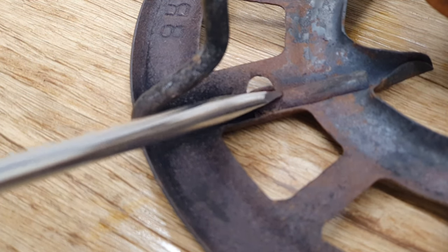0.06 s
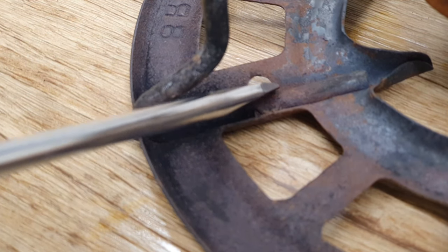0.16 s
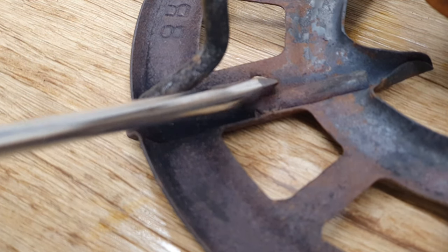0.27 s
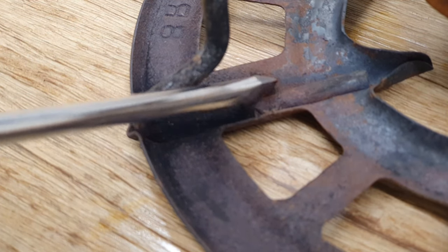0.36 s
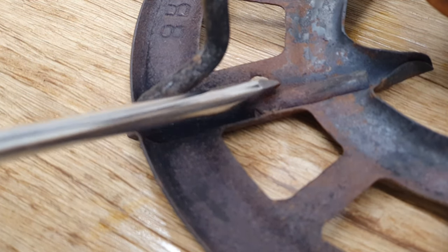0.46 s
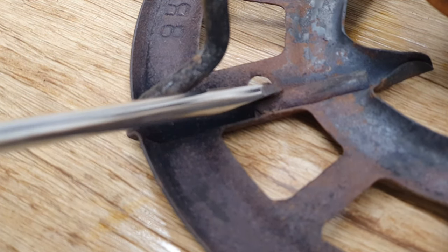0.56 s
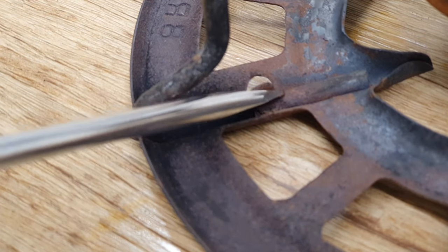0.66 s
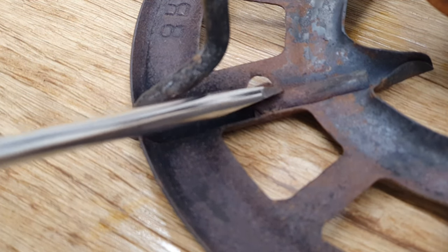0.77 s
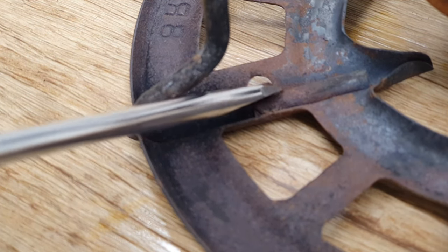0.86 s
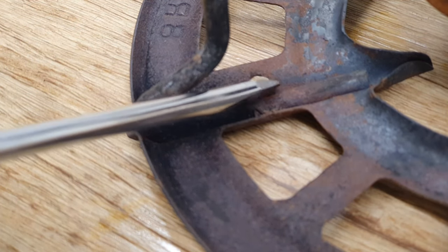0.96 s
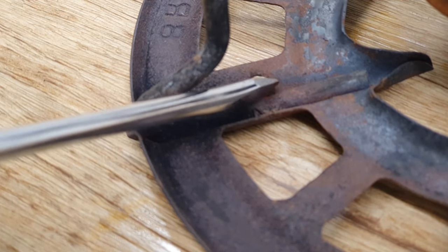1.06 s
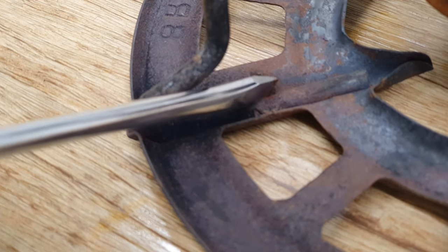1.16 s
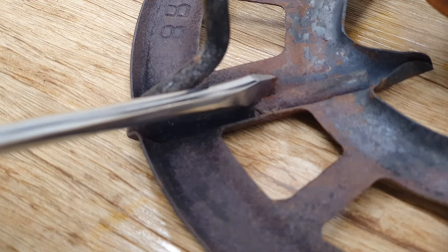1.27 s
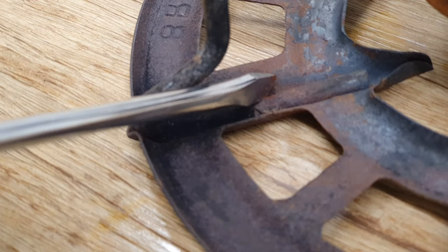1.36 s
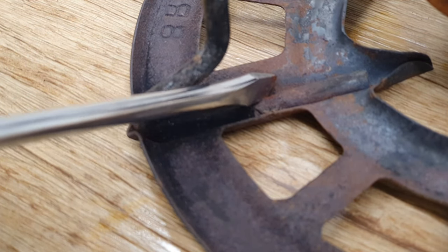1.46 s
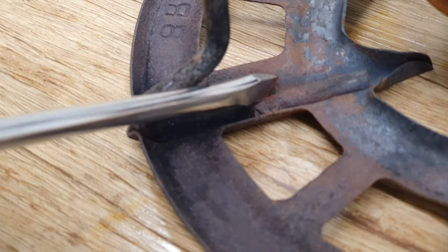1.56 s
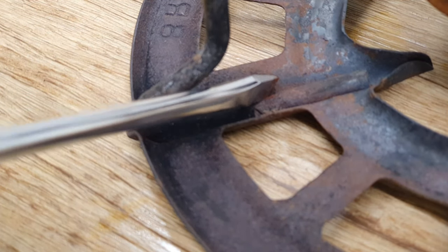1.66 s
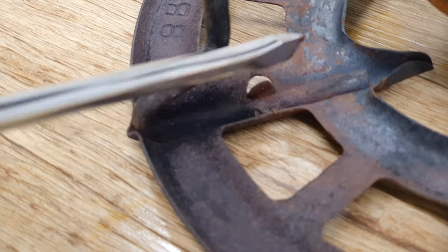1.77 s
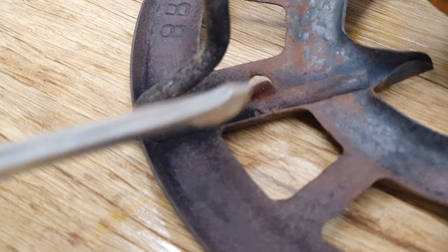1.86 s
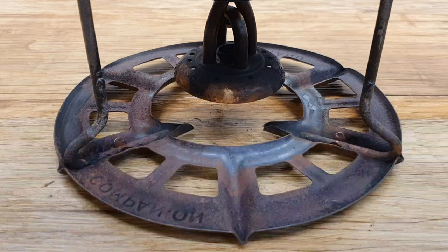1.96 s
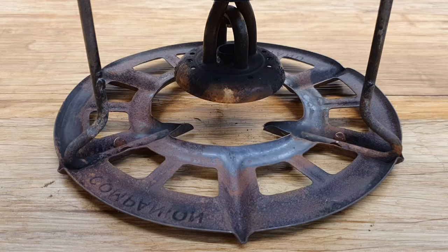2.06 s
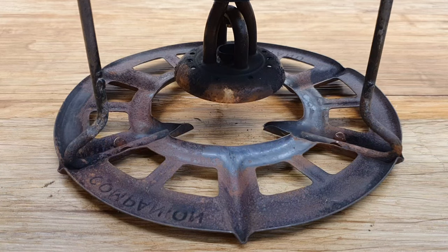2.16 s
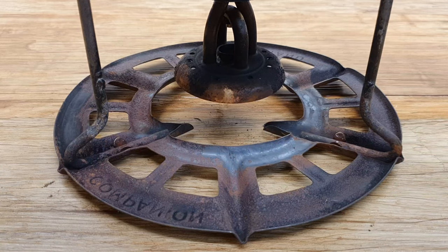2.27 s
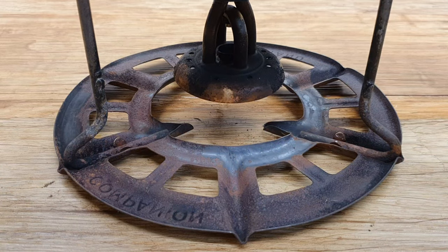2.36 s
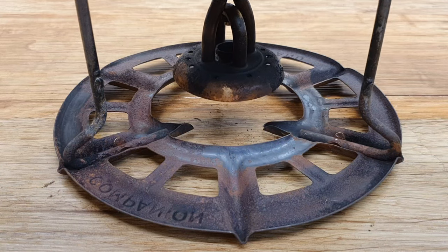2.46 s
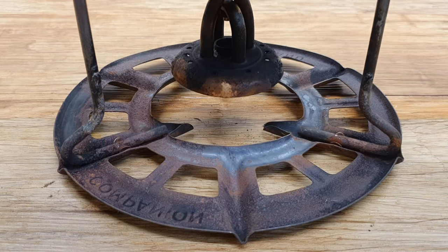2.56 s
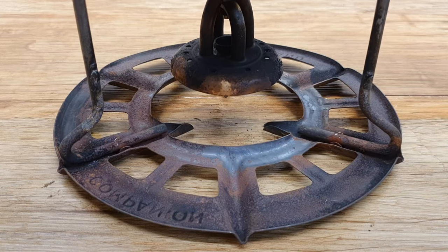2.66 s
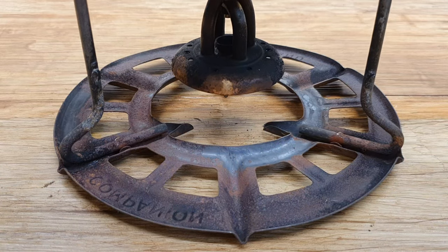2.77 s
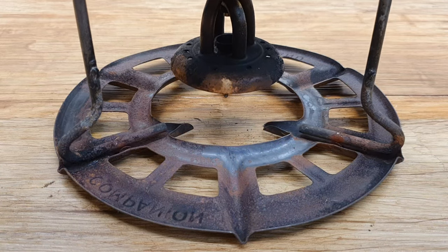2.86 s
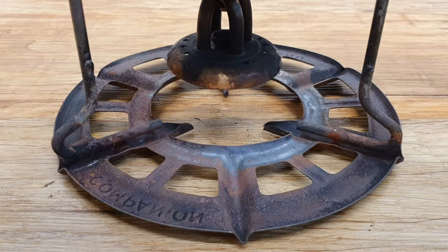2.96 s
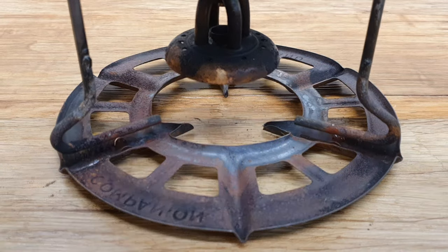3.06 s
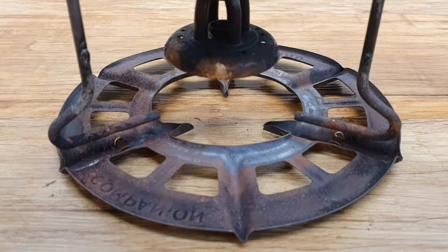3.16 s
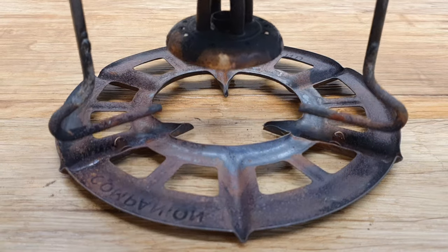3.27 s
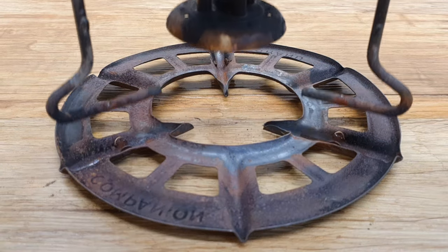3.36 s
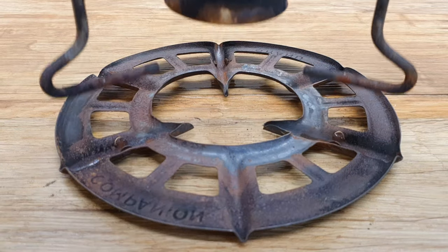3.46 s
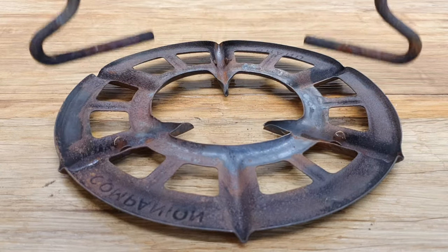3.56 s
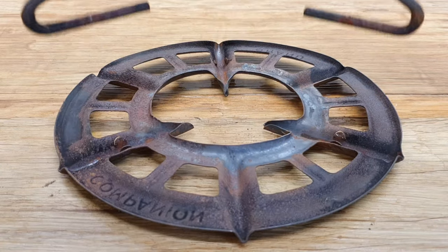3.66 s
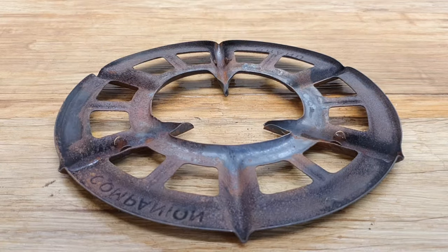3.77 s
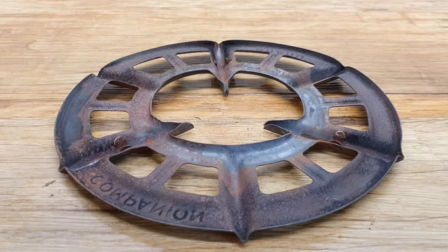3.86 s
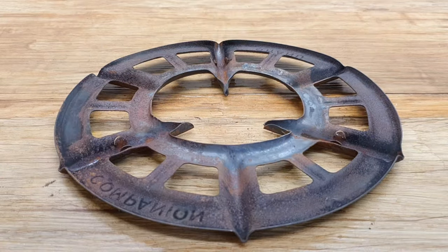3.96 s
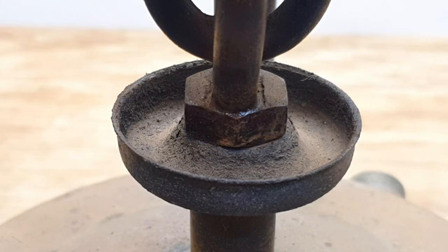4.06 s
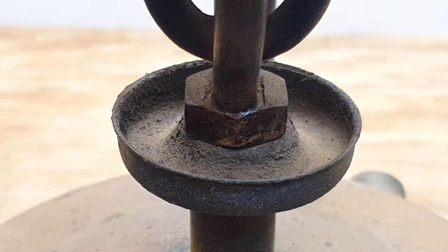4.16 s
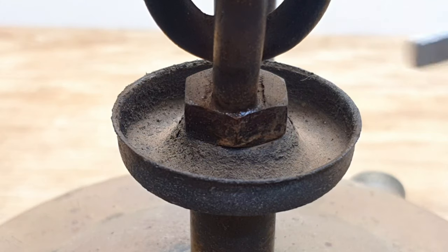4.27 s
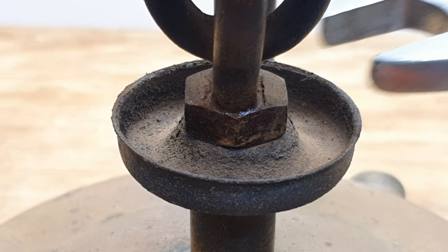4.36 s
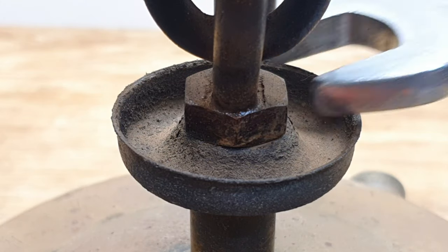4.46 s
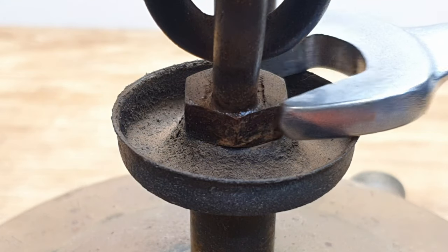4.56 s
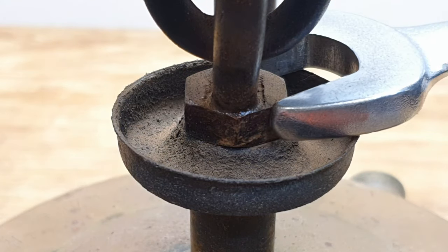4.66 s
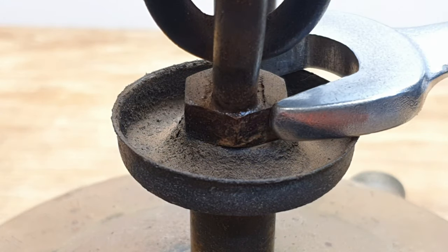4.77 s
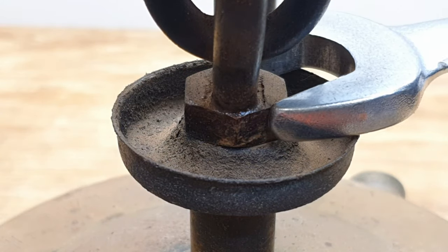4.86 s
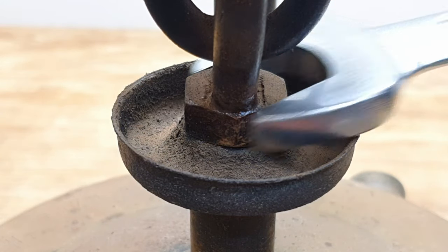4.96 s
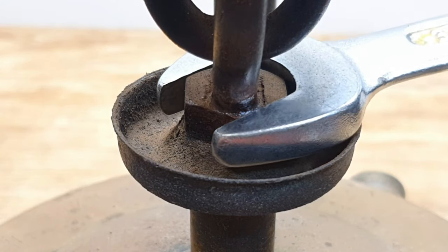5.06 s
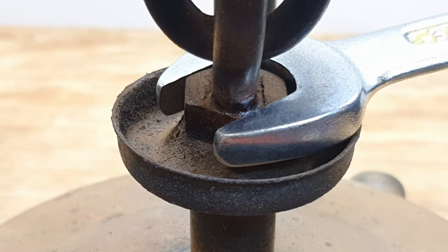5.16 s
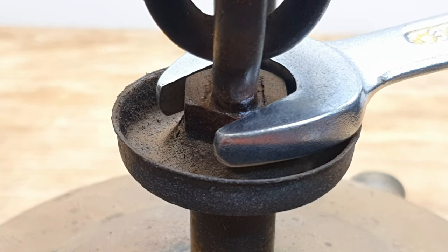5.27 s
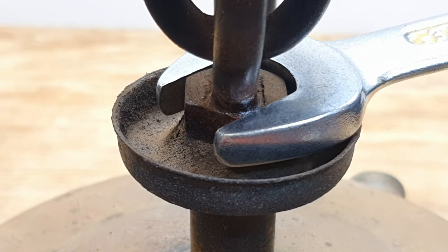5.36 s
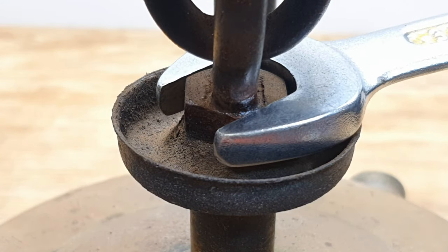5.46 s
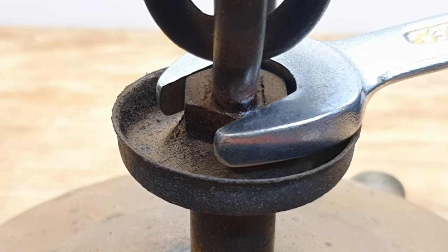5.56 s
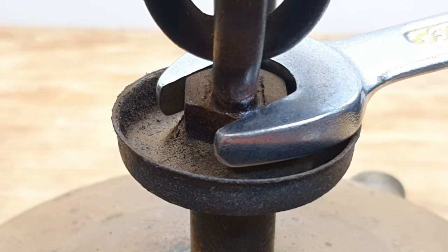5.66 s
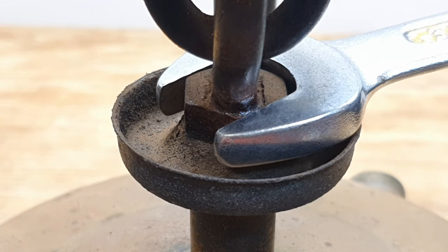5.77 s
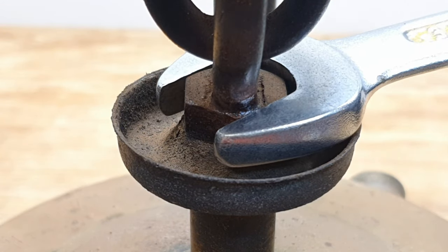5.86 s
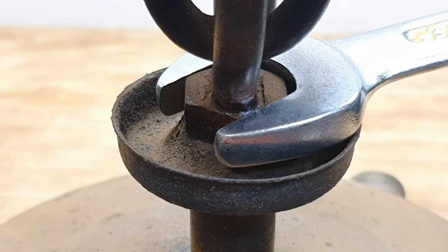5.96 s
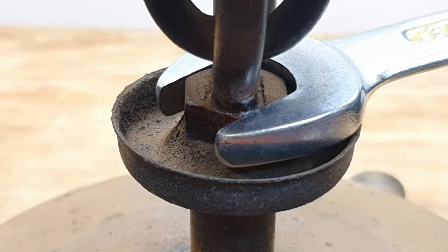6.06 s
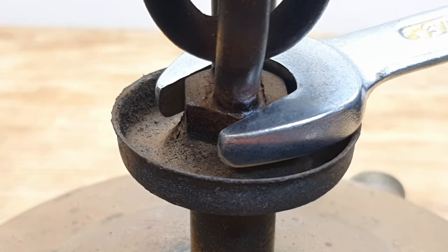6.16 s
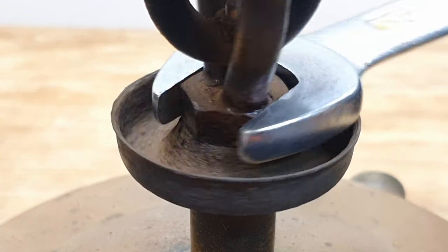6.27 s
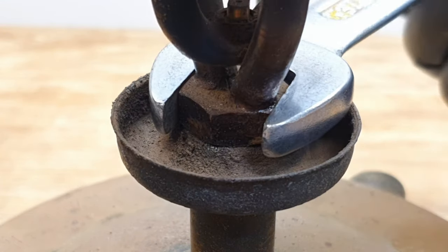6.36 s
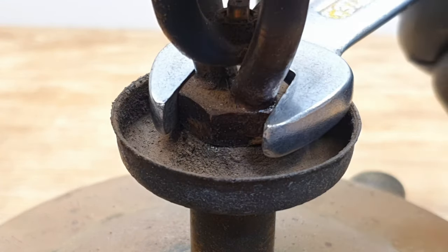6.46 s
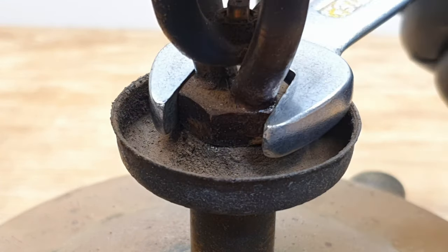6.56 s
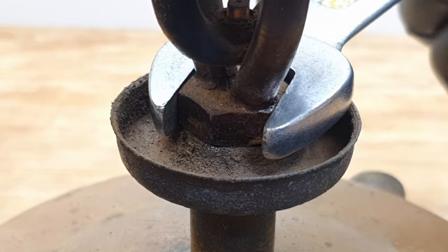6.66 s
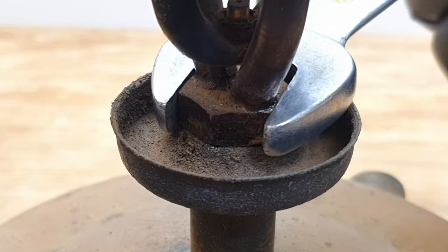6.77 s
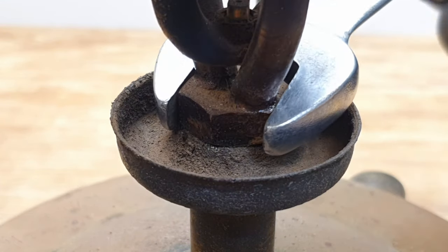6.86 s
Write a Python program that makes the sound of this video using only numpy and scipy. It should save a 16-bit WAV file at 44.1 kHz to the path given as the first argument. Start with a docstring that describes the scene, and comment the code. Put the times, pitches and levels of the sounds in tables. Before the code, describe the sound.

Close to a stereo microphone, rusty steel stove parts are worked on a wooden workshop bench over a low hum and rumble. Gritty scratches and ticks of a screwdriver come first, then the clatter and scrape of a wire frame dragged off a plate. After a brief faint hiss, a spanner strikes the burner and seats on the nut with a louder, ringing clack. The nut squeaks faintly and the grip shifts with light clicks.

```python
"""A rusty steel stove on a wooden workshop bench, close to a stereo microphone, over a low rumble and hum.
First a screwdriver scratches along a pressed steel plate, ticking as it catches on rust. From 2 s a wire
frame knocks on the plate, is dragged off it, sings faintly as it hangs free and is set aside. Just after
4 s a faint hiss lifts the background for half a second. Then a spanner bumps the burner and slides onto
its nut with a ringing clack that booms through the bench. The nut squeaks faintly and the grip shifts."""
import sys
import numpy as np
from scipy import signal
from scipy.fft import rfft, irfft
from scipy.io import wavfile
from scipy.ndimage import uniform_filter1d

SR = 44100
rng = np.random.default_rng(int(sys.argv[2]) if len(sys.argv) > 2 else 0)


def to_wav(sig):
    """Store sig (one row per channel, or 1-D mono) as 16-bit WAV at the path in sys.argv[1].

    Samples outside -1..1 are clipped; the rate is SR.
    """
    pcm = np.clip(np.atleast_2d(sig), -1, 1) * 32767
    pcm = np.round(pcm).astype(np.int16)
    wavfile.write(sys.argv[1], SR, pcm.T)  # frames by channels


N = 304731
TIME = np.arange(N) / SR
RING_TIME = np.arange(SR // 2) / SR
RUB_RISE_S, RUB_T60_S = 0.029, 0.25

# spectra of rust grit, of the bench under it and of clashing steel: frequency_hz, level_db
GRIT_SPECTRUM = [(400, -28), (900, -3), (2100, -4), (2700, -6.5), (4200, -2.5), (5800, -1.5), (7400, 3),
                 (8700, -4.5), (10500, -2.5), (12500, 3), (15200, 0), (16500, 6)]
WOOD_SPECTRUM = [(35, -41), (90, 14), (170, -0.5), (280, 0), (380, -3.5), (560, -2), (760, -13.5),
                 (1300, -18.5), (3000, -19.5), (8000, -39)]
CLASH_SPECTRUM = [(100, 8), (500, 1), (1400, 4), (2300, -3), (4000, -4.5), (6000, -12.5), (16000, -29.5)]
# the stove's foot knocking on the bench: pitch_hz, level_db, t60_s, left_right_db
THUD_MODES = [(175, -7.5, 0.063, -3), (259, 0.5, 0.061, 2), (420, -5.5, .04, -1.5), (558, -3, 0.045, -2)]
# faint rubbing of steel and hand: the frame is set aside, then the grip shifts on the spanner; between
# them, at 4.12 s, a steady hiss lifts the background: start_s, length_s, steel_db, hand_db
FAINT_RUBS = [(3.82, 0.072, -74.5, -89), (4.12, 0.5, -81, -106), (4.33, 0.19, -87, -80.5),
              (4.93, .07, -102, -84), (5.02, .06, -84, -71.5), (5.41, 0.35, -72, -92.5),
              (6.365, 0.13, -75.5, -74.5), (6.56, 0.035, -76.5, -81), (6.63, .07, -80, -91.5),
              (6.85, 0.071, -76, -68)]


def amp(db):
    """Decibels to gain."""
    return 10 ** (np.asarray(db) / 20)


def unit_rms(x):
    """Scales to an rms of one."""
    return x / np.sqrt(np.mean(x ** 2) + 1e-20)


def curve_at(points, hz):
    """Reads a curve on a log-frequency axis."""
    point_hz, value = np.transpose(points)
    return np.interp(np.log(hz + 1), np.log(point_hz + 1), value)


def add(mix, start_s, sound):
    """Mixes a sound in at its start time."""
    part = mix[:, max(round(start_s * SR), 0):][:, :sound.shape[1]]
    part += sound[:, :part.shape[1]]


def pan(db):
    """Left and right gains for a level difference."""
    return amp(np.array([[.5], [-.5]]) * db)


def colour(x, spectrum, lean=1):
    """Shapes two unrelated signals into a stereo pair: bass shared, treble mostly leaning left."""
    # likeness of the two channels: frequency_hz, coherence
    likeness = [(60, 0.94), (150, 0.91), (600, 0.45), (1400, 0), (3000, 0.087), (16000, 0)]
    # balance at the microphone: frequency_hz, left_right_db
    balance = [(100, -1.5), (700, 0.5), (1400, 0.5), (4400, 4.5), (6000, 2.5), (8100, 11.5), (10500, -3.5),
               (15000, 8)]
    hz = np.fft.rfftfreq(x.shape[1], 1 / SR)
    left, unrelated = rfft(x)
    shared = np.clip(curve_at(likeness, hz), 0, 1)
    right = shared * left + np.sqrt(1 - shared ** 2) * unrelated
    shaped = np.array([left, right]) * amp(curve_at(spectrum, hz)) * pan(lean * curve_at(balance, hz))
    return unit_rms(irfft(shaped, x.shape[1]))


def resonate(x, peaks, order=1):
    """Resonances (pitch_hz, width_hz, level_db); a higher order leaves darker valleys between them."""
    hz = np.fft.rfftfreq(N, 1 / SR)
    response = sum(amp(db) / (1 + 2j * (hz - pitch) / width) ** order for pitch, width, db in peaks)
    return unit_rms(irfft(rfft(x) * response, N))


def ring(modes):
    """Dying sines that build up in about one cycle; higher ones differ more in phase left to right."""
    t, out = RING_TIME, 0
    for hz, db, t60, side_db in modes:
        phase = np.array([[1], [-1]]) * rng.normal() * min(hz / 5000, .6)
        envelope = amp(db - 60 * t / t60) * (1 - np.exp(-t * hz))
        out = out + pan(side_db) * envelope * np.sin(2 * np.pi * hz * t + phase)
    return out


def burst(spectrum, t60, tail_db, tail_t60, lean=1):
    """A blow's crowd of short-lived modes, with a weaker, longer tail."""
    t = RING_TIME
    fade = amp(-60 * t / t60) + amp(tail_db - 60 * t / tail_t60)
    attack = 1 - np.exp(-t / .0005)
    return colour(rng.standard_normal((2, len(t))), spectrum, lean) * fade * attack


def friction(per_s, spread_db, clump_db, hiss):
    """Rust grains snapping in clumps, each a tiny puff, over a smooth hiss."""
    sizes = amp(spread_db * np.minimum(rng.exponential(1, N), 4))
    snaps = sizes * (rng.random(N) < per_s / SR)
    power = signal.lfilter([1], [1, -np.exp(-1 / (0.00085 * SR))], snaps ** 2)
    clumps = unit_rms(uniform_filter1d(uniform_filter1d(rng.standard_normal(N), size=500), size=300))
    envelope = np.sqrt(power / power.mean() + hiss) * amp(clump_db * clumps)
    return unit_rms(envelope * rng.standard_normal((2, N)))


def convolve_tail(x, tail):
    """The ringing a signal leaves through a decaying tail, scaled to unit energy on the left."""
    return signal.fftconvolve(x, tail / np.linalg.norm(tail[0]), axes=1)[:, :N]


def body(x, t60, direct):
    """Crowded steel modes: a short random ring that gives friction a steady, uneven colour."""
    t = RING_TIME[:len(RING_TIME) // 4]
    tail = rng.standard_normal((2, len(t))) * amp(-60 * t / t60)
    return unit_rms(direct * x + convolve_tail(x, tail))


def wander(x, depth_db):
    """The contact point moves, so different modes swell and fade in turn."""
    spectra = signal.stft(x, nperseg=1024, noverlap=768)[2]
    patches = uniform_filter1d(rng.standard_normal(spectra.shape[1:]), size=4, axis=0)
    patches = unit_rms(uniform_filter1d(patches, size=12, axis=1))
    return unit_rms(signal.istft(spectra * amp(depth_db * patches), nperseg=1024, noverlap=768)[1][:, :N])


def strokes(rows, rise_s, t60, swell_db=0, db_column=2):
    """Gain over time for rows of start_s, length_s and levels: each rises, holds or swells, and dies."""
    power = np.zeros(N)
    for row in rows:
        first, length_s = round(row[0] * SR), row[1]
        t = TIME[:N - first][:round((length_s + t60) * SR)]
        swell = swell_db * np.minimum(t / length_s - 1, 0)
        decay = 60 * np.maximum(t - length_s, 0) / t60
        gain = np.minimum(t / rise_s, 1) * amp(row[db_column] + swell - decay)
        power[first:first + len(t)] += gain ** 2
    return np.sqrt(power)


def background():
    """Still air, a wavering hum and a handling rumble that swells as weight sways the bench."""
    # spectra of the quiet room and of the rumble: frequency_hz, level_db
    air_spectrum = [(12, -50), (20, -14.5), (86, -5.5), (134, -17.5), (293, -23.5), (367, -28.5),
                    (485, -31.5), (642, -29.5), (1060, -32.5), (1190, -35.5), (1660, -37.5), (1860, -35.5),
                    (8180, -47), (13500, -46), (16000, -46)]
    rumble_spectrum = [(20, -10.5), (45, -4.5), (65, 0.5), (87, -4.5), (110, -10), (170, -11), (260, -29.5),
                       (700, -55.5)]
    # each job has its own rumble and hum: start_s, rumble_db, hum_db
    jobs = [(0, -62.5, -63.5), (2.08, -66, -64.5), (4.04, -70, -85)]
    # sways of the bench: start_s, length_s, level_db
    sways = [(.505, 0.043, -54.5), (1.3, 0.069, -50.5), (4.67, 0.058, -53.5), (5.14, 0.067, -47.5),
             (6.82, 0.061, -53)]
    air = amp(-68.5) * colour(rng.standard_normal((2, N)), air_spectrum, lean=0.24)
    starts, rumble_db, hum_db = np.transpose(jobs)
    job = np.searchsorted(starts[1:], TIME)
    hum_gain = uniform_filter1d(amp(hum_db)[job], size=2000)
    hum = hum_gain * resonate(rng.standard_normal((1, N)), [(83.6, 2.0, 0)])
    handling_gain = uniform_filter1d(amp(rumble_db)[job], size=2000)
    rumble_gain = np.hypot(handling_gain, strokes(sways, rise_s=.025, t60=0.083))
    return air + hum + rumble_gain * colour(rng.standard_normal((2, N)), rumble_spectrum)


def screwdriver():
    """The tip grinds through rust; the shaft rings and the bench answers dully."""
    # the tip pushing, and resting between pushes: start_s, length_s, relative_grit_db, rubbing_db
    pushes = [(0.08, 0.029, -48, -49.5), (0.13, 0.097, -60.5, -70), (0.265, 0.25, -64, -67.5),
              (0.6, 0.066, -62, -66), (0.68, 0.083, -58, -65), (0.775, 0.13, -59.5, -70.5),
              (1.06, 0.38, -64.5, -63), (1.445, 0.024, -52.5, -82), (1.5, 0.17, -87, -68.5),
              (1.812, 0.021, -55.5, -61.5), (1.875, 0.017, -53.5, -65.5)]
    resting = [(0, 2.3, -72, -74.5)]
    # shaft and plate resonating under the tip: pitch_hz, width_hz, level_db
    shaft_peaks = [(2085, 110, -21.5), (3190, 480, -21.5), (4250, 150, -21), (6120, 59, -12.5),
                   (7270, 310, -18)]
    grains = friction(per_s=400, spread_db=4.2, clump_db=1.8, hiss=.5)
    shaft = amp(-17) * pan(3.3) * resonate(grains, shaft_peaks)
    grit = wander(amp(7.5) * colour(grains, GRIT_SPECTRUM) + shaft, depth_db=2.5)
    rubbing = friction(per_s=140, spread_db=0.5, clump_db=1.5, hiss=.7)
    rubbing = colour(body(rubbing, t60=.12, direct=.8), WOOD_SPECTRUM)
    contact, rise_s, t60 = pushes + resting, 0.014, 0.17
    return strokes(contact, rise_s, t60) * grit + strokes(contact, rise_s, t60, db_column=3) * rubbing


def rust_ticks():
    """Steel catches on rust and lets go: a sharp tick, a faint ring of the shaft and a dull knock."""
    # screwdriver or spanner catching: start_s, relative_tick_db, relative_knock_db
    catches = [(0.051, -57.5, -54.5), (0.0956, -54, -53), (0.106, -44.5, -41), (0.118, -50, -40),
               (0.173, -49, -81), (0.286, -54.5, -81), (0.3565, -57.5, -73), (.479, -82, -47.5),
               (0.497, -61, -67), (0.6226, -50, -45), (0.7661, -52, -70), (0.8812, -52, -72),
               (1.066, -65, -83), (1.1255, -58.5, -54.5), (1.159, -54, -82), (1.2433, -52.5, -52.5),
               (1.3017, -55.5, -50), (1.377, -56.5, -73), (1.3986, -54.5, -47.5), (1.435, -56, -71),
               (1.4548, -49.5, -77), (1.479, -54.5, -47.5), (1.5368, -56.5, -45.5), (1.5979, -61, -53),
               (1.6245, -54.5, -49.5), (2.0229, -59, -82), (5.284, -68, -86), (6.4315, -54, -72),
               (6.441, -52.5, -49), (6.478, -60, -52), (6.6694, -67, -68.5)]
    # the shaft ringing on: pitch_hz, level_db, t60_s, left_right_db
    shaft_modes = [(2030, -3, 0.15, -5), (2173, -7.5, 0.21, 12), (2973, -2, 0.086, 10),
                   (4020, 2, 0.089, -11), (5630, 0, 0.064, 9)]
    out = np.zeros((2, N))
    for s, tick_db, knock_db in catches:
        add(out, s, amp(tick_db + 8) * burst(GRIT_SPECTRUM, t60=.022, tail_db=-21, tail_t60=.12))
        add(out, s, amp(tick_db - 20) * ring(shaft_modes))
        add(out, s, amp(knock_db - 4.5) * burst(WOOD_SPECTRUM, t60=0.078, tail_db=-20, tail_t60=0.11))
        add(out, s, amp(knock_db - 0.5) * ring(THUD_MODES))
    return out


def wire_frame():
    """The frame clatters on the plate, its feet scrape and keep the plate sounding, then it sings free."""
    # feet sliding on the plate: start_s, length_s, relative_grit_db, relative_drone_db
    drags = [(2.07, 0.036, -66.5, -74.5), (2.205, 0.021, -54.5, -66), (2.315, 0.053, -95, -71),
             (2.607, 0.15, -50, -55), (2.685, 0.086, -51, -79), (2.77, 0.065, -58.5, -63),
             (2.818, 0.21, -56, -64.5)]
    # grit under the feet: frequency_hz, level_db
    drag_spectrum = [(900, -38), (2000, -16), (3500, -12), (4200, -8), (4800, 0), (6400, -9), (7200, 8.5),
                     (8300, -4), (10500, 1.5), (12400, 0.5), (13700, 10), (15200, 5.5), (16500, 3.5)]
    # squeaking feet, droning plate and free frame: pitch_hz, width_hz, level_db
    squeak_peaks = [(2397, 16, 2.5), (3470, 34, -1), (5000, 42, 5.5), (6007, 63, 5.5), (6900, 430, -2),
                    (9500, 130, -2), (11900, 88, 3), (11500, 24, -4), (13200, 72, 3), (14800, 40, -6),
                    (15600, 190, 5)]
    drone_peaks = [(260, 100, -2), (575, 50, 2), (650, 70, 5), (930, 120, -6), (1030, 55, -1),
                   (1200, 110, -13), (1450, 120, -9)]
    frame_peaks = [(684, 4.3, 2), (781, 6, -14), (1030, 8.1, -3)]
    # the frame landing: start_s, ring_db, clash_db, grit_db
    landings = [(2.2164, -73, -72, -68), (2.24, -69, -68, -66), (2.4565, -66, -59, -78),
                (2.474, -56, -49, -47), (2.479, -52, -44, -50), (2.4865, -41, -42, -51),
                (2.491, -58, -42, -53), (2.714, -74, -74, -42), (2.849, -74, -74, -40),
                (2.897, -76, -74, -45), (2.952, -74, -72, -39), (3.014, -76, -76, -47)]
    # the struck plate: pitch_hz, level_db, t60_s, left_right_db
    plate_modes = [(265, -10, .15, 0), (571, -3, .15, 0), (645, -12, .12, 3), (890, -16, .25, 0),
                   (977, -8, .1, 0), (1180, -10, .1, 0), (1322, -2, .16, 0), (1462, 1, .21, -2),
                   (1611, -10, .1, 0), (2030, -6, .19, 0), (2072, -7, .18, 0), (2291, -11, .1, 0),
                   (2379, -14, .14, 0), (2767, -15, .12, 0), (3779, -16, .11, 0), (4242, -22, .15, 0),
                   (4522, -19, .12, 0), (5195, -24, .15, 0), (7386, -30, .2, 3)]
    # the frame hanging free: start_s, length_s, level_db
    lift = [(3.02, 1.0, -85)]
    slips = friction(per_s=500, spread_db=1.2, clump_db=1.2, hiss=.7)
    scrape = amp(-1) * colour(body(slips, t60=.03, direct=1), drag_spectrum)
    squeak = amp(-8.5) * pan(2.5) * resonate(slips[::-1], squeak_peaks)
    rubbing = colour(friction(per_s=380, spread_db=-6, clump_db=-3, hiss=0.98), CLASH_SPECTRUM)
    grit = wander(scrape + squeak, depth_db=4.5)
    drone = wander(resonate(rubbing, drone_peaks, order=2), depth_db=3.5)
    # the grit stops with the feet, the plate sounds on
    grit *= strokes(drags, rise_s=.05, t60=0.1)
    drone *= strokes(drags, rise_s=.05, t60=0.3, db_column=3)
    out = amp(3.5) * (grit + drone)
    out += strokes(lift, rise_s=.03, t60=0.47) * resonate(rng.standard_normal((2, N)), frame_peaks)
    for s, ring_db, clash_db, grit_db in landings:
        add(out, s, amp(ring_db) * ring(plate_modes))
        add(out, s, amp(clash_db) * burst(CLASH_SPECTRUM, t60=0.065, tail_db=-13.5, tail_t60=0.27))
        add(out, s, amp(grit_db) * burst(drag_spectrum, t60=0.057, tail_db=-37, tail_t60=0.13))
    return out


def hand():
    """Skin rubs faintly on steel: on the frame as it is set aside, then on the spanner's handle."""
    # resonances of the hand on steel: pitch_hz, width_hz, level_db
    hand_peaks = [(960, 250, -12), (1430, 86, -9.5), (1700, 62, -0.5), (1900, 120, -7), (2950, 130, -16)]
    skin = colour(friction(per_s=470, spread_db=4, clump_db=-1, hiss=0.32), CLASH_SPECTRUM)
    return strokes(FAINT_RUBS, RUB_RISE_S, RUB_T60_S, db_column=3) * resonate(skin, hand_peaks)


def spanner():
    """Amid faint rubs and hiss the jaws slide and strike; burner and spanner ring, and the bench booms."""
    # jaws on the nut, pressed harder until they seat: start_s, length_s, final_db
    slides = [(4.67, 0.085, -66), (5.084, .068, -43.5), (6.42, 0.0079, -42)]
    # blows on the burner: start_s, burner_db, spanner_db, clack_db, boom_db, knock_db
    blows = [(4.676, -64, -65, -41, -56, -42.5), (4.6806, -54.5, -46.5, -40.5, -47.5, -30),
             (4.6983, -55, -49, -24.5, -59, -35), (4.7006, -32, -24.5, -49, -36.5, -38),
             (4.751, -73, -49.5, -58, -59, -48.5), (5.1582, -49, -59.5, -31.5, -61.5, -46),
             (5.1637, -44, -54, -19, -55, -37), (5.1666, -14.5, -33, -23.5, -32.5, -33.5),
             (6.433, -71, -72, -49, -72, -66), (6.441, -73, -75, -52, -75, -53),
             (6.479, -70, -78, -61, -75, -42)]
    # spectra of sliding jaws, rubbing steel and the clack: frequency_hz, level_db
    jaw_spectrum = [(100, -14), (260, 5), (400, -14), (530, 13), (680, -2), (950, -20.5), (1400, -14.5),
                    (2100, -1.5), (2500, -18), (3050, -3), (4000, 0.5), (5000, -15.5), (8000, -16),
                    (10000, -29.5), (16000, -31.5)]
    rub_spectrum = [(180, -48), (300, -1.5), (689, -5), (1140, -22.5), (1340, -6), (2840, -21.5),
                    (4910, -18), (5800, -11.5), (8790, -24), (12700, -15.5), (16000, -18.5)]
    clack_spectrum = [(40, -35), (130, -13.5), (380, -19.5), (560, -0.5), (780, -13.5), (1050, -10.5),
                      (1400, 0), (2050, 0), (2400, -11), (3100, 5.5), (3600, -2.5), (4300, -14),
                      (5000, -44), (6300, -23.5), (9000, -40), (13000, -37.5), (16500, -43.5)]
    # the bodies a blow sets ringing: pitch_hz, level_db, t60_s, left_right_db
    burner_modes = [(540, 0, .07, 0), (570, -1, .07, 0), (605, -11, .07, 0), (1003, -21, .11, 0),
                    (1105, -18, .06, -5), (1409, -9, .085, -3), (1510, -31, .2, 2), (1725, -20, .07, 6),
                    (1900, -18, .09, 11), (2045, -27, .21, 3), (2138, -13, .08, 1), (2440, -26, .08, 0),
                    (2856, -5, .062, 4), (2872, -37, .44, 3), (3097, -1, .052, 8), (3140, -28, .2, 5),
                    (3278, -23, .1, 3), (3372, -14, .07, 6), (3865, -28, .09, 5), (4244, -25, .1, 7),
                    (4380, -24.5, .17, 14), (5782, -35, .08, 3), (6350, -33, .05, 3), (7040, -49, .3, 2)]
    spanner_modes = [(605, -15, .11, 0), (735, -26, .24, 5), (785, -25, .19, 5), (1012, -22, .14, 2),
                     (1367, -5, .075, 7), (1900, -15, .06, 9), (2121, -16, .12, 0), (3040, -15, .11, 6),
                     (3538, -1, .065, 12), (3570, -8, .055, 7), (4393, -28, .17, 10)]
    bench_modes = [(126, 3, .24, 0), (137, -2, .24, 0), (191, 5, .17, 0), (231, 3, .18, -3)]
    sliding = colour(friction(per_s=700, spread_db=1.5, clump_db=1.2, hiss=.7), jaw_spectrum, lean=1.2)
    rubbing = colour(friction(per_s=400, spread_db=2, clump_db=1, hiss=2), rub_spectrum)
    out = strokes(slides, rise_s=0.04, t60=.11, swell_db=3) * sliding
    out += strokes(FAINT_RUBS, RUB_RISE_S, RUB_T60_S) * rubbing
    for s, burner_db, spanner_db, clack_db, boom_db, knock_db in blows:
        add(out, s, amp(burner_db) * ring(burner_modes) + amp(spanner_db) * ring(spanner_modes))
        clack = burst(clack_spectrum, t60=0.04, tail_db=-19.5, tail_t60=0.12, lean=1.6)
        add(out, s, amp(clack_db) * clack)
        add(out, s, amp(boom_db) * ring(bench_modes) + amp(knock_db) * ring(THUD_MODES))
    # deep bass below about 75 Hz is taken away
    return signal.sosfilt(signal.butter(2, 75, "high", fs=SR, output="sos"), out)


def nut():
    """The nut squeaks faintly under load, in one narrow resonance."""
    # squeaks: start_s, length_s, level_db
    squeaks = [(5.62, .035, -84), (5.68, 0.052, -75.5)]
    tone = resonate(rng.standard_normal((2, N)), [(5720, 27, 0)])
    return strokes(squeaks, rise_s=0.028, t60=0.066) * tone


def room(x, wet_db, t60):
    """A weak, short workshop echo that reaches the microphone after the direct sound."""
    t = RING_TIME
    echo_spectrum = [(100, -2.5), (3000, -7), (8000, 4.5), (16000, -17.5)]  # frequency_hz, level_db
    noise = colour(rng.standard_normal((2, len(t))), echo_spectrum, lean=0)
    tail = noise * amp(-60 * t / t60) * (t > .006)
    return x + amp(wet_db) * convolve_tail(x, tail)


def scene():
    """Three jobs on the stove, one after another, heard from close by the bench."""
    work = screwdriver() + rust_ticks() + wire_frame() + spanner() + hand() + nut()
    return room(work, wet_db=-27.5, t60=0.25) + background()


def record(dry):
    """The level dips briefly just after 2 s, and the treble ends at 16 kHz."""
    dip = 1 - .95 * (abs(TIME - 2.084) < .008)
    lowpass = signal.firwin(511, 16000, window=("kaiser", 9), fs=SR)
    return signal.oaconvolve(dry * dip, lowpass[None], "same")


dry = scene()
out = record(dry)
to_wav(out)
```